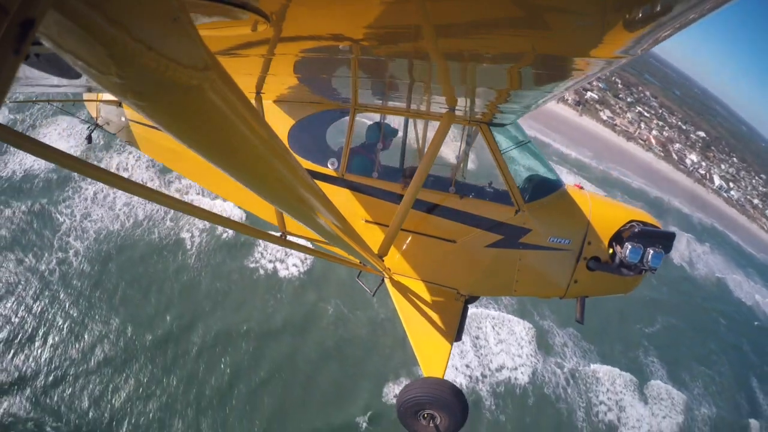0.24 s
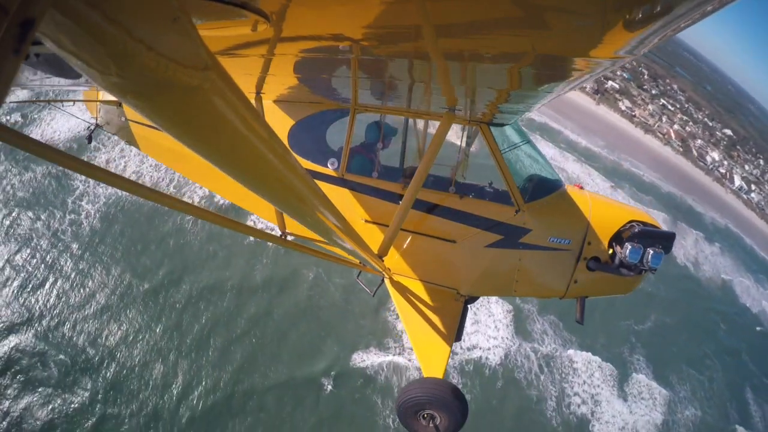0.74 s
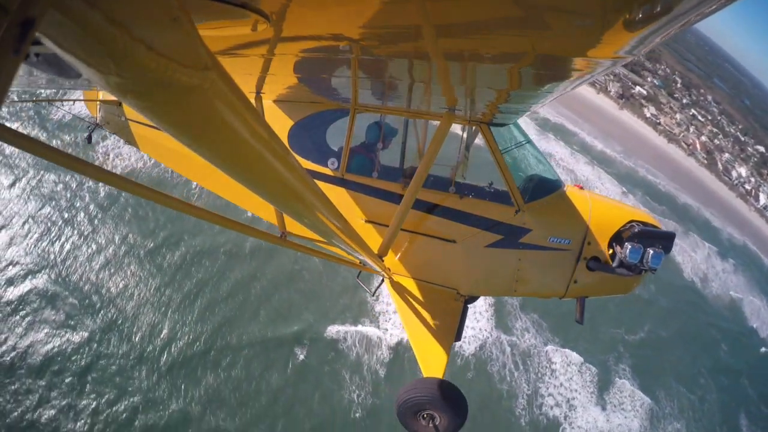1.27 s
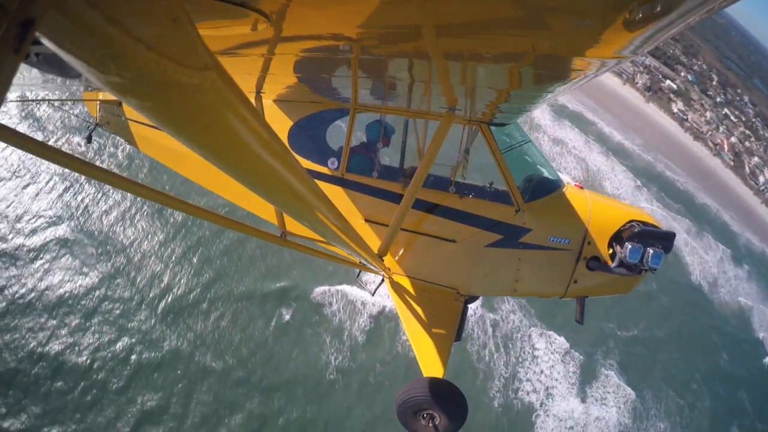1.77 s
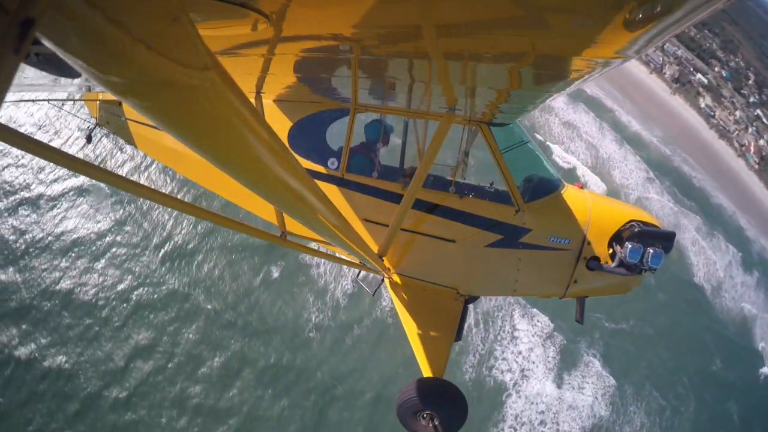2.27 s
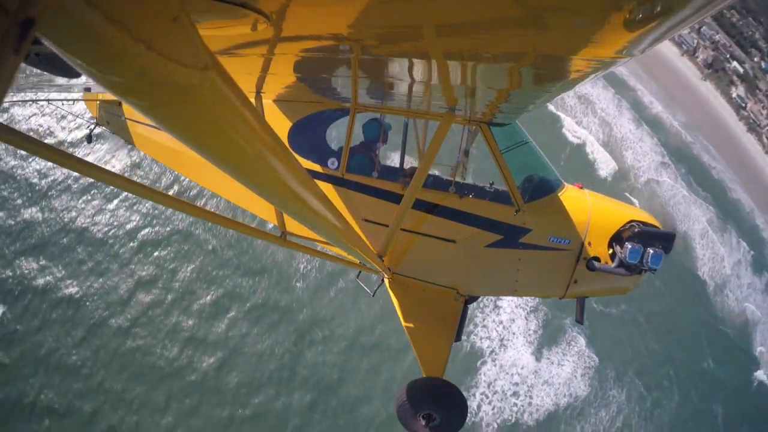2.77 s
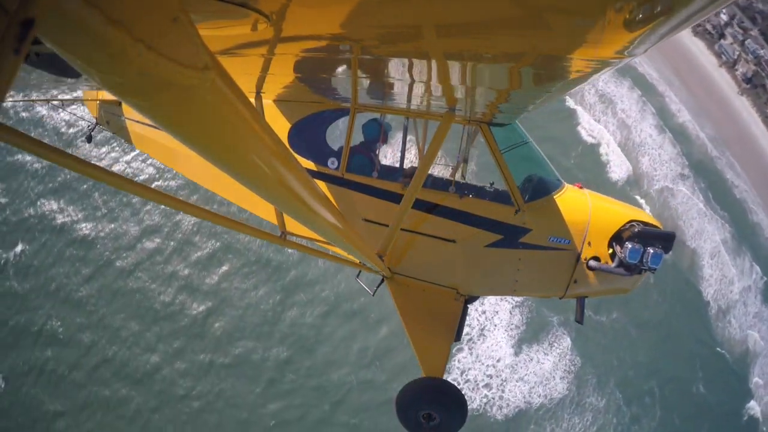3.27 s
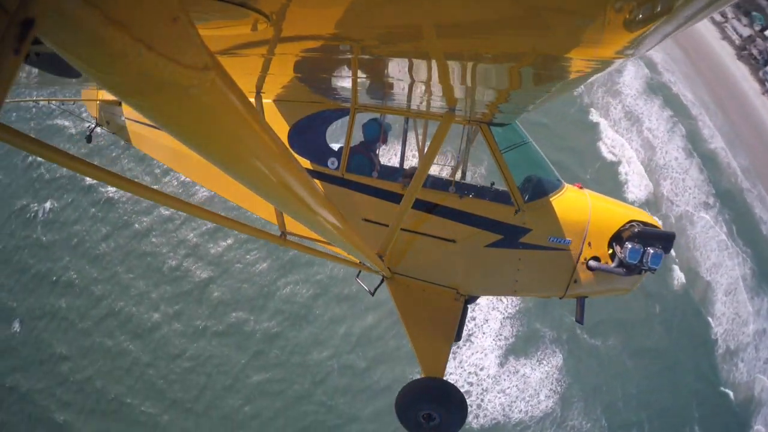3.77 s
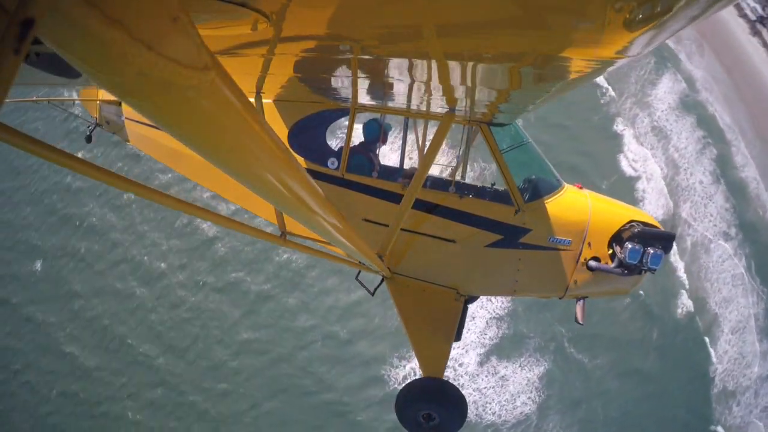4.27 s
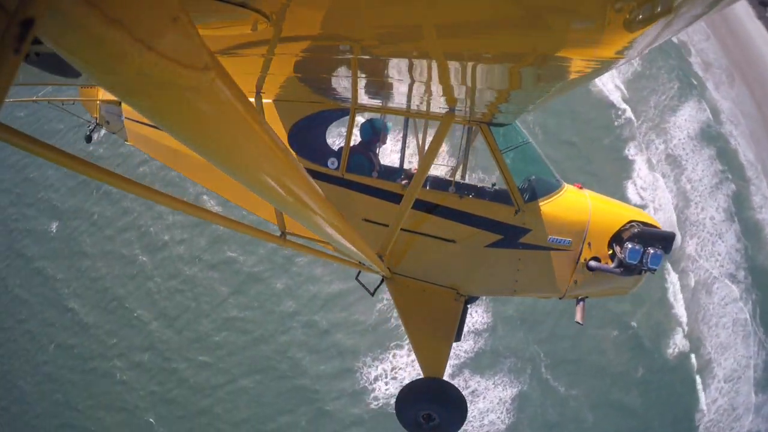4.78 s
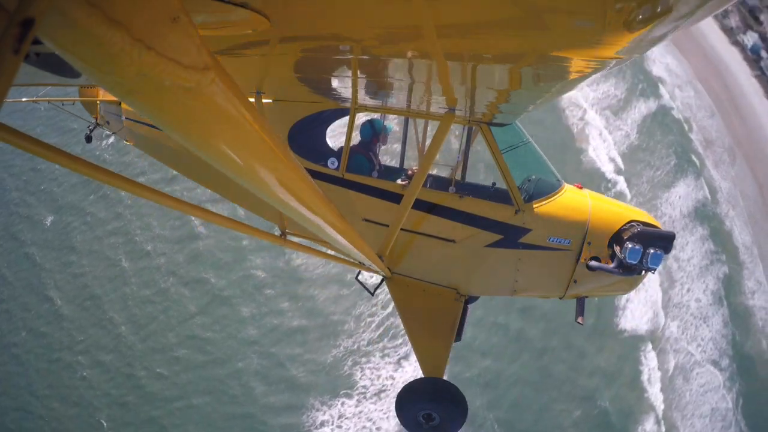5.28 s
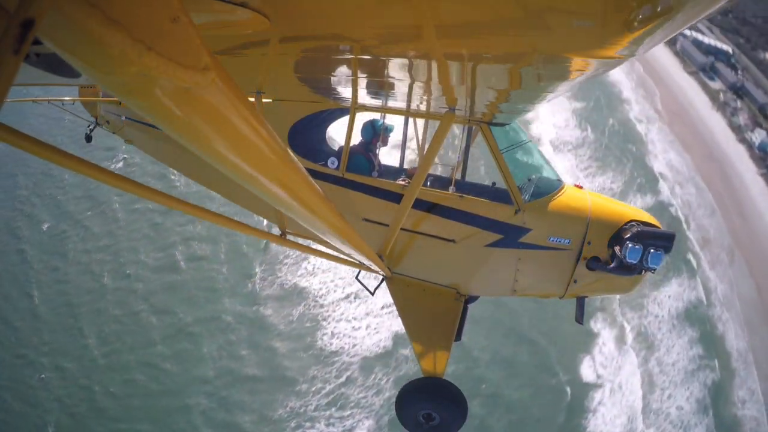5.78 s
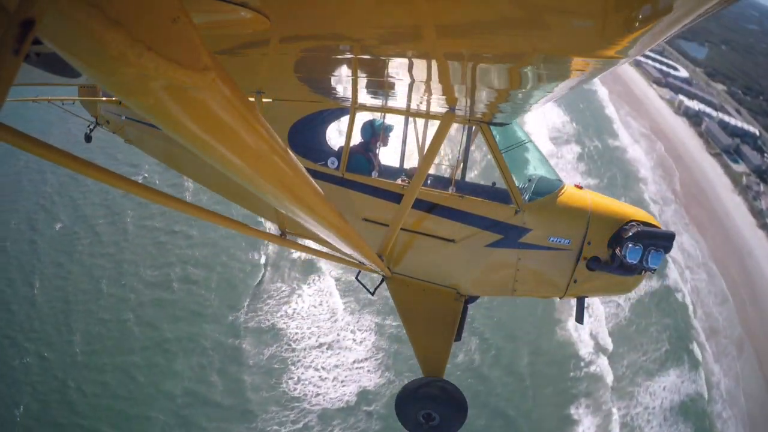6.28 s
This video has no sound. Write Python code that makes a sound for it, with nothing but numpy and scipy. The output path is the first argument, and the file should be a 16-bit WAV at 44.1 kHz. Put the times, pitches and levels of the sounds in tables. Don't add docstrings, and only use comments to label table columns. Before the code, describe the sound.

Heavy wind roar batters a microphone under an aeroplane wing while the four-cylinder engine buzzes on evenly, its overtones swelling and fading.

```python
import sys
import numpy as np
from scipy import signal
from scipy.io import wavfile
from scipy.ndimage import uniform_filter1d

SR = 44100
rng = np.random.default_rng(int(sys.argv[2]) if len(sys.argv) > 2 else 0)


def transcribe(signal):
    frames = np.atleast_2d(signal).T
    limited = np.clip(frames, -1, 1)
    pcm = np.round(limited * 32767).astype(np.int16)
    wavfile.write(sys.argv[1], SR, pcm)


def elevation(decibels):
    levels = np.asarray(decibels, float)
    return 10 ** (levels / 20)


N = 288414

# t/s, firing rate f/Hz
FIRING_RATE = [(0.0, 79.69), (0.5, 79.31), (1.01, 79.3), (1.51, 79.4), (2.01, 79.27), (2.52, 79.45),
               (3.02, 79.49), (3.52, 79.59), (4.02, 79.76), (4.53, 79.94), (5.03, 79.93), (5.53, 79.95),
               (6.04, 80.21), (6.54, 80.46)]
FIRST_TURN = 0.205
# order/1, level/dB rms
HUM_ORDERS = [(3, -30.5), (6, -33), (7, -37), (10, -45), (12, -32), (14, -34), (18, -32), (21, -31),
              (23, -29.5), (24, -41), (25, -30.5), (27, -32.5), (28, -51), (29, -41.5), (31, -41)]
# level/dB, puff delay/ms, puff width/ms, wake delay/ms,
# valve seating/ms, tick share/1
STUBS = [
    (-4, 0.14, 1.9, 0.71, 3.4, .12),
    (-2.5, -0.93, 1.35, -0.2, 2.6, .3),
    (-2.5, -0.52, 1.3, -0.3, 3.2, .3),
    (-2.8, -0.39, 1.8, 0.98, 3.3, .08),
]
# centre t/s, half length/s, level/dB rms
SECOND_SWELLS = [
    (1.8, 0.75, -23),
    (3.1, 0.76, -24.5),
    (4.5, 0.72, -25),
    (5.6, 0.52, -23),
]
FOURTH_SWELLS = [
    (1.4, .4, -21.5),
    (2.1, 0.31, -19.5),
    (3.1, 0.54, -27),
    (4.2, 0.33, -28),
    (5.9, .35, -26),
]
FIFTH_SWELLS = [
    (1.5, .7, -31),
    (2.75, 0.47, -23.5),
    (3.8, .5, -24.5),
    (4.65, 0.33, -21),
    (5.8, .6, -27),
]
OVERTONE_REST_DB = -37
FIRING_DB, FIRING_FACING_DB = -21, 5
EXHAUST_DB, EXHAUST_FACING_DB, EXHAUST_FLICKER_DB = -53.3, 5, 0.45
# f/Hz, level/dB per Hz
PUFF_COLOUR = [(5000, -30), (7000, -20), (9000, -10), (11500, 1.5), (13500, -2.5), (15500, -3.5),
               (20000, -12)]
# f/Hz, level/dB per Hz
WAKE_COLOUR = [(1200, -10), (2500, -3), (4500, 1.5), (6500, -7.5), (9300, -14), (11000, -15.5),
               (15500, -28), (20000, -32)]
# f/Hz, width/Hz, level/dB
HOUSING = [(1810, 460, 2.5), (2280, 530, -2), (2880, 490, 5.5), (3670, 360, -4.5), (5040, 340, 4.5),
           (7670, 310, 3.5), (8470, 500, -3.5), (9280, 400, 7), (11700, 1700, 2.5), (14000, 800, 1.5)]
# t/s, facing/0-1
FACING = [(0.0, 0), (0.3, .35), (0.9, 0.25), (1.4, 0.75), (1.8, 0.94), (2.4, 0.97), (3.0, 0.15), (3.5, 0.7),
          (4.1, 0.34), (4.5, 0.6), (5.0, 0.3), (5.6, 0.52), (6.1, 0.55), (6.54, 0.5)]
# f/Hz, level/dB per Hz
BUFFET_COLOUR = [(11, -30), (20, -4.5), (38, -2.5), (72, -4), (110, -3), (180, 0), (280, -2), (420, -2.5),
                 (480, -6.5), (560, -10.5), (690, -19.5), (1000, -37.5)]
# centre t/s, half length/s, roar/dB, deep boom/dB, thump/dB
EDDIES = [(0.02, 0.069, .8, 0, 4), (0.4, 0.055, 1, 1.1, .1), (0.8, 0.19, -.8, -1.5, 2.4),
          (2.496, .1, .6, .1, 2), (2.82, 0.1, 1.8, 5, 2.1), (3.304, 0.45, -1.2, -2, -2.5),
          (4.0, .15, 1.3, -0.5, -2), (4.603, .12, 1, 0, 0.5), (5.15, 0.33, -0.7, 5.5, .1),
          (5.7, 0.26, -1, 5, 2.5), (6.4, 0.16, 0.2, 0, -4.1)]
BUFFET_DB, BUFFET_DB_PER_FLOW_DB, BUFFET_FACING_DB, BUFFET_LUMPS_DB = -11.8, -0.12, -1, 0.5
THUMP_FACING_DB, THUMP_LUMPS_DB = -5.5, 1.2
# t/s, level/dB
SLIPSTREAM = [(0.0, -22), (0.16, -23), (0.6, -23.5), (1.12, -21.5), (1.3, -24), (2.0, -25.6), (2.7, -26),
              (3.0, -28), (3.19, -30), (3.6, -28.2), (4.0, -28), (4.15, -29.7), (4.9, -31), (5.3, -30),
              (5.58, -32.5), (6.06, -29.5), (6.38, -31), (6.54, -28)]
MEAN_FLOW_DB = -27
# f/Hz, level/dB per Hz
HISS_COLOUR = [(300, -15), (600, 2), (1000, -0.5), (2000, -5.5), (3200, -13.5), (3800, -17), (5500, -22.5),
               (7000, -30), (9000, -36.2), (15000, -41.3), (20000, -44)]
BAND_EDGE_HZ = 15310


def evened(x):
    return x / np.sqrt(np.mean(x ** 2) + 1e-20)


def curve(rows, t=None):
    rows = np.array(rows)
    at = np.arange(N) / SR if t is None else t
    return np.interp(at, rows[:, 0], rows[:, 1])


def read(points, hz):
    f, db = np.transpose(points)
    return np.interp(np.log(hz + 1), np.log(f + 1), db, left=-90)


def bells(rows, heights, t):
    return sum(h * np.exp(-((t - row[0]) / row[1]) ** 2) for row, h in zip(rows, heights))


def wander(top_hz, count=24):
    t = np.arange(0, N + 256, 256) / SR
    rates_hz = np.geomspace(top_hz / 30, top_hz, count)
    slow = sum(np.sin(2 * np.pi * (f * t + rng.random())) / np.sqrt(f) for f in rates_hz)
    return np.interp(np.arange(N) / SR, t, evened(slow))


def noise(colour, size, patchy_db, patch_hz, patch_s):
    hop = size // 4
    frames, hz = N // hop + 5, np.fft.rfftfreq(size, 1 / SR)
    real, imag, patches = rng.standard_normal((frames, len(hz), 3)).T
    patches = uniform_filter1d(patches, max(1, round(patch_hz * size / SR)), 0)
    patches = evened(uniform_filter1d(patches, max(1, round(patch_s * SR / hop)), 1))
    level_db = colour(hz[:, None], np.arange(frames) * hop / SR) + patchy_db * patches
    spectra = (real + 1j * imag) * elevation(level_db)
    return evened(signal.istft(spectra, nperseg=size, noverlap=size - hop)[1][:N])


def housing_db(hz):
    return sum(db / (1 + (2 * (hz - f) / width) ** 2) for f, width, db in HOUSING)


def swelling(rows):
    power = bells(rows, elevation(np.transpose(rows)[2]) ** 2, np.arange(N) / SR)
    return 10 * np.log10(power + elevation(OVERTONE_REST_DB) ** 2)


def hum(firings):
    firing_db = FIRING_DB + FIRING_FACING_DB * curve(FACING)
    firing_tones = [(4, firing_db), (8, swelling(SECOND_SWELLS)),
                    (16, swelling(FOURTH_SWELLS)), (20, swelling(FIFTH_SWELLS))]
    out = np.zeros(N)
    for order, db in HUM_ORDERS + firing_tones:
        share = order / 24
        level = elevation(db + (0.2 + 0.9 * share) * wander(12) - 1.5 * share ** 2)
        lag = 1.82 + 2 * np.pi * rng.random() * (order % 4 > 0)
        lag -= np.pi / 2 * (order == 8)
        jitter = 0.6 * share ** 2 * wander(25)
        out += np.sqrt(2) * level * np.cos(np.pi / 2 * order * firings + lag + jitter)
    return out


def jets(firings):
    number = np.floor(firings + 0.45).astype(int)
    puff_size, wake_size, early = rng.standard_normal((number[-1] + 1, 3)).T
    db, puff_late, puff_wide, wake_late, seats, tick = np.array(STUBS)[number % 4].T
    since_ms = 1000 * (firings - number + 0.012 * early[number]) / curve(FIRING_RATE)

    puff = np.exp(-((since_ms - puff_late) / puff_wide) ** 2)
    puff += tick * np.exp(-((since_ms - seats) / 0.35) ** 2)
    puff *= elevation(db + 0.5 * puff_size[number])
    opened_ms = np.maximum(since_ms - wake_late + 2.44, 0)
    wake = (1 - np.exp(-(opened_ms / 1.1) ** 2)) * np.exp(-opened_ms / 4.0)
    wake *= elevation(db + 0.84 * wake_size[number])

    bright = noise(lambda hz, t: read(PUFF_COLOUR, hz) + housing_db(hz),
                   size=256, patchy_db=1.2, patch_hz=1500, patch_s=0.004)
    dull = noise(lambda hz, t: read(WAKE_COLOUR, hz) + housing_db(hz),
                 size=256, patchy_db=1.5, patch_hz=1200, patch_s=0.0056)
    level_db = EXHAUST_DB + EXHAUST_FACING_DB * curve(FACING) + EXHAUST_FLICKER_DB * wander(4.6)
    return elevation(level_db) * (evened(puff * bright) + elevation(8.0) * evened(wake * dull))


def buffet():
    lumps, knocks, t = wander(7.9), wander(5.7), np.arange(N) / SR
    roar_db, boom_db, thump_db = np.transpose(EDDIES)[2:]

    def colour(hz, at):
        boom = (bells(EDDIES, boom_db, at) - 1.26) * np.exp(-((hz - 185) / 45) ** 2)
        thump = bells(EDDIES, thump_db, at) + THUMP_FACING_DB * (curve(FACING, at) - 0.4)
        thump = thump + THUMP_LUMPS_DB * np.interp(at, t, knocks)
        return read(BUFFET_COLOUR, hz) - 200 * (hz > 1000) + boom + thump * (hz < 65)

    level_db = BUFFET_DB + BUFFET_DB_PER_FLOW_DB * (curve(SLIPSTREAM) - MEAN_FLOW_DB)
    level_db = level_db + BUFFET_FACING_DB * curve(FACING)
    level_db = level_db + bells(EDDIES, roar_db, t) + BUFFET_LUMPS_DB * lumps
    return elevation(level_db) * noise(colour, size=2048, patchy_db=1.04, patch_hz=80, patch_s=0.13)


def slipstream():
    def colour(hz, t):
        flow_db = curve(SLIPSTREAM, t)
        near_1khz = np.exp(-(np.log2(hz / 1000 + 0.0072) / 0.72) ** 2)
        body = -0.55 * (flow_db - MEAN_FLOW_DB) * near_1khz
        gust = flow_db - uniform_filter1d(flow_db, size=260, mode="nearest")
        steady = -0.8 * gust * np.clip((hz - 2500) / 1500, 0, 1)
        return read(HISS_COLOUR, hz) + housing_db(hz) + body + steady

    hiss = noise(colour, size=512, patchy_db=0.29, patch_hz=920, patch_s=0.038)
    flutter = uniform_filter1d(rng.standard_normal(N), size=160)
    flutter = evened(uniform_filter1d(flutter, size=160))
    sos = signal.butter(4, [1000, 3500], "band", fs=SR, output="sos")
    band = signal.sosfiltfilt(sos, hiss)
    return elevation(curve(SLIPSTREAM) - 0.18 + 0.79 * flutter) * hiss / np.std(band)


def scene():
    firings = FIRST_TURN + np.cumsum(curve(FIRING_RATE)) / SR
    return (hum(firings) + jets(firings) + buffet() + slipstream())[None]


def roll_off(x):
    return signal.sosfilt(signal.butter(12, 15680, fs=SR, output="sos"), x)


def record(dry):
    opening = np.minimum(np.arange(N) / (0.003 * SR), 1)
    knee, room = 0.72, 0.21
    over = np.maximum(abs(dry) - knee, 0)
    limited = np.sign(dry) * (np.minimum(abs(dry), knee) + room * np.tanh(over / room))
    held = opening * limited
    edge = signal.firwin(2047, BAND_EDGE_HZ, window=("kaiser", 8), fs=SR)
    low = signal.oaconvolve(held, edge[None], "same")
    return roll_off(low + elevation(-22) * (held - low))


dry = scene()
out = record(dry)
transcribe(out)
```